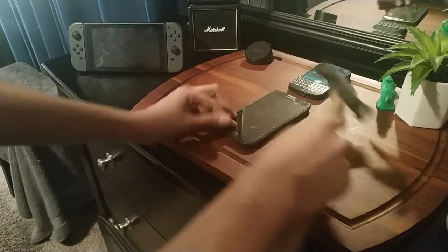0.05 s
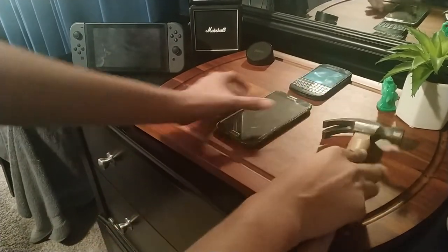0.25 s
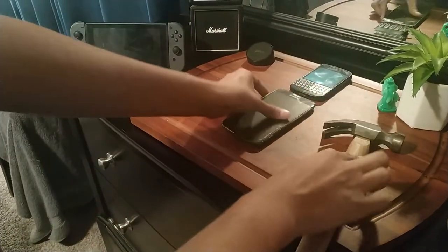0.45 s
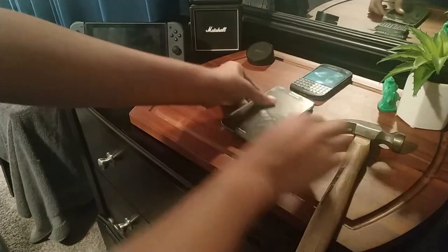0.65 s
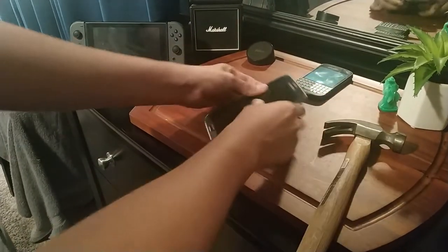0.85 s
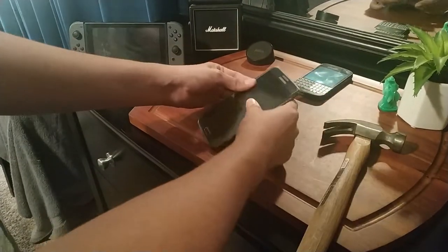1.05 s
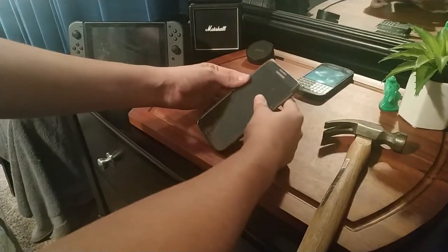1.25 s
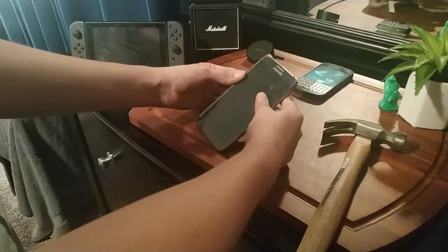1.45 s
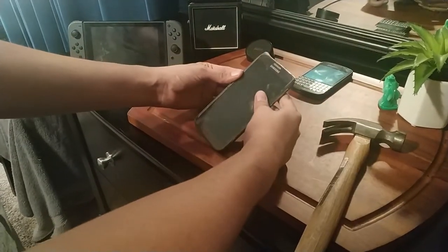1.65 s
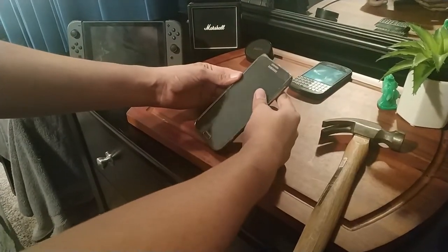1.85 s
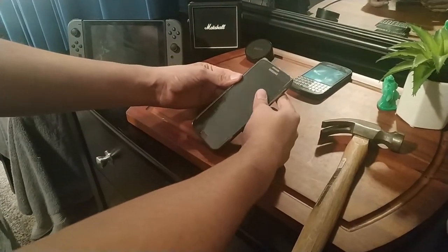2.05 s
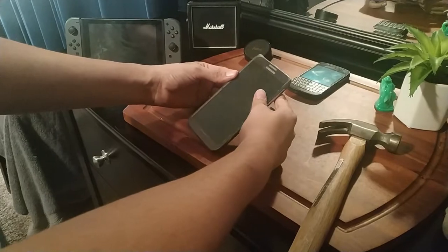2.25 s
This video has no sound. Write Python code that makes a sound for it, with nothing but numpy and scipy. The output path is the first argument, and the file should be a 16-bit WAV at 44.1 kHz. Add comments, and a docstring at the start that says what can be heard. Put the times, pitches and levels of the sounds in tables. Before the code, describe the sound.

Three quick hammer knocks on wood as it lands, followed by soft rubs and taps.

```python
"""At a desk in a small room, a claw hammer is laid down on a wooden board. Head, claw and handle land
in three sharp knocks with light rocking between. Each landing rings the board and thuds the desk, the
hard ones ring the hammer too, and the wall sends back a quick echo. Then two hands slide a phone off
the board and turn it over, with faint rubs and taps. A low room rumble runs underneath."""
import sys
import numpy as np
from scipy import signal
from scipy.fft import rfft, irfft, next_fast_len
from scipy.io import wavfile
from scipy.ndimage import uniform_filter1d, minimum_filter1d

SR = 44100
rng = np.random.default_rng(int(sys.argv[2]) if len(sys.argv) > 2 else 0)


def digitize_waveform(pressure):
    """Quantize a signal to 16-bit integers and store it at the path in sys.argv[1].

    Rows of a 2-D input are taken as channels; values are limited to [-1, 1].
    """
    field = np.atleast_2d(pressure).T
    bounded = np.clip(field, -1, 1)
    quanta = np.round(bounded * 32767).astype(np.int16)
    wavfile.write(sys.argv[1], SR, quanta)


N = 101429
TIME = np.arange(N) / SR
ROOM_FADE_S, TOUCH_RISE_S = 0.32, 0.00033  # every fade time is the time to fall by 60 dB


def from_db(db):
    """Turn decibels into a number to multiply by."""
    return 10 ** (np.asarray(db) / 20)


def unit_power(x):
    """Scale a sound so that its average power is one."""
    return x / np.sqrt(np.mean(x ** 2) + 1e-20)


def noise(spectrum, colour=np.zeros_like):
    """Noise shaped by (pitch_hz, level_db) rows, brought to power one, then tinted by a colour in dB."""
    hz, db = np.transpose(spectrum)
    size = next_fast_len(N)
    bins_hz = np.maximum(np.fft.rfftfreq(size, 1 / SR), 1)
    shape = unit_power(from_db(np.interp(np.log(bins_hz), np.log(hz), db)))
    gain = shape * from_db(colour(bins_hz))
    return irfft(rfft(rng.standard_normal(size)) * gain, size)[:N]


def decay(fade_s):
    """Die away by 60 dB every fade_s seconds."""
    return np.exp(-np.minimum(np.log(1000) * TIME / fade_s, 40))


def rise(seconds):
    """Build up smoothly from zero to one."""
    return 1 - np.exp(-TIME / seconds)


def stroke(middle_s, half_length_s):
    """A movement swells to its middle and fades again."""
    return np.exp(-((TIME - middle_s) / half_length_s) ** 2 / np.sqrt(2))


def struck_tone(hz, fade_s):
    """One pure tone of a struck object, dying away."""
    return np.sin(2 * np.pi * hz * TIME) * decay(fade_s)


def at(start_s, x):
    """Delay a sound to its starting time."""
    return np.concatenate([np.zeros(max(int(start_s * SR), 0)), x])[:N]


def low_pass(x, hz):
    """Dull a sound by turning down what lies above hz."""
    return signal.sosfilt(signal.butter(2, min(hz, SR / 2 - 1), fs=SR, output="sos"), x)


def resonant(x, hz, width_hz):
    """Keep a narrow band around one pitch, brought to power one."""
    return unit_power(signal.lfilter(*signal.iirpeak(hz, hz / width_hz, fs=SR), x))


def room_background():
    """Steady room noise and a low rumble that swells and sinks."""
    # tone of the steady noise: pitch_hz, level_db
    steady_spectrum = [(25, 5), (60, -10.5), (100, -12), (200, -13.5), (350, -16), (410, -20.5), (470, -16),
                       (560, -24.5), (800, -24), (2400, -32.5), (2850, -24.5), (3300, -31.5), (6000, -47),
                       (11000, -39), (13500, -32.5)]
    # tone of the rumble: pitch_hz, level_db
    rumble_spectrum = [(12, -19.5), (20, -9.5), (30, 1), (58, -3), (90, -10), (200, -19), (600, -49.5)]
    # loudness of the rumble: time_s, level_db
    rumble_levels = [(0.0, -49), (0.06, -44), (0.16, -53), (0.24, -30.5), (0.28, -51), (0.33, -35),
                     (0.72, -56.5), (0.85, -40.5), (1.0, -62), (1.41, -50), (1.57, -56.5), (2.3, -51)]
    rumble_gain = from_db(np.interp(TIME, *np.transpose(rumble_levels)))
    return from_db(-56) * noise(steady_spectrum) + rumble_gain * noise(rumble_spectrum)


def slides_and_rubs():
    """Grainy friction: things slide on wood, and skin rubs the phone, which sounds hollow in the grip."""
    # slides over the wood: middle_s, half_length_s, level_db
    slides = [(0.025, 0.08, -53.5), (0.694, .03, -47.5), (0.793, 0.0705, -49.5)]
    # tone of sliding: pitch_hz, level_db
    slide_spectrum = [(100, 1.5), (400, 1.5), (1300, 4), (2900, 5), (5000, -10), (8000, -14.5),
                      (11000, -5.5), (14000, 1.5)]
    # skin rubbing the phone: middle_s, half_length_s, level_db, grip_pitch_hz, grip_db
    rubs = [(1.244, 0.074, -67, 257, -81), (1.34, 0.042, -74.5, 430, -60), (1.438, .04, -59.5, 306, -52.5),
            (1.561, 0.082, -69.5, 330, -62), (1.791, 0.036, -72, 390, -50), (1.844, 0.03, -68, 343, -60.5),
            (2.02, .12, -70, 410, -60), (2.233, .03, -65, 308, -71)]
    # tone of rubbing: pitch_hz, level_db
    rub_spectrum = [(200, 2.5), (900, 1.5), (1600, 3.5), (2800, -4.5), (4500, -8), (7000, -32),
                    (14000, -14)]
    # the phone's case rings under the skin: pitch_hz, level_db
    case_tones = [(2130, -6.5), (2850, -7), (3550, -9.5)]
    flutter = unit_power(low_pass(rng.standard_normal(N), hz=148))
    grain = unit_power(from_db(2.5 * flutter))  # fast level changes sound rough
    out = noise(slide_spectrum) * sum(from_db(db) * stroke(s, half_s) for s, half_s, db in slides)
    friction = noise(rub_spectrum)
    case_ring = sum(from_db(db) * resonant(friction, hz, width_hz=200) for hz, db in case_tones)
    skin = noise(rub_spectrum) + case_ring
    for middle_s, half_s, db, grip_hz, grip_db in rubs:
        hollow = from_db(grip_db) * resonant(friction, grip_hz, width_hz=93)
        out += stroke(middle_s, half_s) * (from_db(db) * skin + hollow)
    return out * grain


def finger_taps():
    """Fingers and phone touch lightly: each tap is a tick that lingers in the room, plus a soft bump."""
    # light touches: start_s, tick_db, brightness_hz, bump_db
    taps = [(0.619, -43, 5000, -59), (0.687, -44.5, 11000, -79), (0.814, -53.5, 7000, -50),
            (1.078, -48.5, 9100, -46.5), (1.178, -62, 3500, -51.5), (1.409, -47, 2500, -50.5),
            (2.183, -77, 1980, -52)]
    # tone of the tick: pitch_hz, level_db
    tick_spectrum = [(200, -10), (600, 6), (1500, 13), (2900, 17), (4500, 3), (7000, -23), (14000, -32)]
    # tone of the low bump: pitch_hz, level_db
    bump_spectrum = [(50, -4), (120, 7.5), (200, 2), (280, 2.5), (450, -16), (900, -17), (3000, -31)]
    tick_fade = decay(0.027) + from_db(-4.5) * decay(ROOM_FADE_S)
    out = np.zeros(N)
    for start_s, tick_db, brightness_hz, bump_db in taps:
        tick = from_db(tick_db) * low_pass(noise(tick_spectrum), brightness_hz) * tick_fade
        bump = from_db(bump_db) * noise(bump_spectrum) * decay(0.39)
        out += at(start_s, (tick + bump) * rise(TOUCH_RISE_S))
    return out


def case_creaks():
    """The phone's case slips twice, each time with a tiny high ring."""
    # slips of the case: start_s, level_db
    slips = [(2.224, -34), (2.2296, -37)]
    creak = struck_tone(hz=2700, fade_s=0.01) * rise(TOUCH_RISE_S)
    return sum(at(start_s, from_db(db) * creak) for start_s, db in slips)


def board_tone(hz):
    """One tone of the struck board, wavering at random as if close tones were beating with it."""
    fade_s = 0.33 * (1000 / hz) ** 0.15  # higher tones die sooner
    waver_depth, waver_hz = 0.2, 20
    step_times = np.arange(0, N / SR, 1 / (2 * waver_hz))
    steps = waver_depth * rng.standard_normal((2, len(step_times)))
    swell, phase = (np.interp(TIME, step_times, row) for row in steps)
    strength = from_db(-1.5 * rng.standard_normal())  # a little different at each blow
    return strength * (1 + swell) * np.sin(2 * np.pi * hz * TIME + phase) * decay(fade_s)


def board_knocks():
    """Each landing of the hammer rings the board and thuds the desk, and the room rings on."""
    # landings: start_s, level_db (all but the thud), rise_s, low_db, middle_db, treble_db, top_db,
    # ring_db, thud_db, room_db
    landings = [(0.2102, 6, .0015, -1, 3, -11, 0.5, -3, -35.5, -4),
                (0.297, -2.5, .002, 1, 2.5, -12, -5.5, -6, -38, -6.5),
                (0.3455, 2.5, .0007, 1, 4, -10, -4.5, -2, -34, 5),
                (0.4509, -14, .002, 0, 5, -12.5, -19.5, -3.5, -50.5, -2),
                (0.4605, 3.5, 0.00087, -1, -2.5, -3, -13, -1.5, -29.5, 5)]
    # where a landing's low, middle, unchanged, treble and top ranges lie: pitch_hz
    ranges_hz = [500, 1300, 2200, 3400, 5500]
    # ringing tones of board and desk: pitch_hz
    board_pitches = [410, 474, 689, 820, 1084, 1106, 1150, 1187, 1302, 1528, 1572, 1625, 1695, 2005, 2083,
                     2170, 2263, 2446, 2618, 2762, 2902, 3080]
    # strength of each of those tones: level_db
    board_levels = [-35.5, -30, -29.5, -26.5, -23.5, -25.5, -27, -27.5, -23, -23, -27.5, -24.5, -31.5, -29,
                    -28, -33, -28.5, -26.5, -27, -29.5, -29, -30.5]
    # the wood's crowded, short-lived tones, heard as noise: pitch_hz, level_db
    wood_spectrum = [(100, -19), (350, -16), (700, -6), (1300, 1), (2200, 1.5), (3100, -2), (4000, -6.5),
                     (5500, -24), (8000, -38)]
    # low tones of the desk: pitch_hz, level_db, fade_s
    desk_tones = [(61, 3, 0.38), (173, -4, 0.18), (232, -2, 0.1)]
    # sound that lingers in the room: pitch_hz, level_db
    room_spectrum = [(80, -16), (200, -7.5), (330, -10.5), (550, -11.5), (750, -8), (950, -12.5),
                     (1200, -7), (1600, -3.5), (1800, -5), (2600, -1.5), (3300, -8), (4000, -8),
                     (5000, -20.5), (6500, -41.5), (9000, -40.5)]
    # the high hiss in that lingering sound: pitch_hz, level_db
    air_spectrum = [(5000, -7), (7000, -6), (9000, -3), (11000, -13.5), (13500, -1)]
    out = np.zeros(N)
    for start_s, db, rise_s, low_db, middle_db, treble_db, top_db, ring_db, thud_db, room_db in landings:
        def colour(hz):
            """How many dB this landing adds or takes away at a pitch."""
            return np.interp(np.log(hz), np.log(ranges_hz), [low_db, middle_db, 0, treble_db, top_db])
        ring = sum(from_db(ring_db + tone_db + colour(hz)) * board_tone(hz)
                   for hz, tone_db in zip(board_pitches, board_levels))
        wood = from_db(-8.5) * noise(wood_spectrum, colour) * decay(0.05)
        room = from_db(-20.5) * noise(room_spectrum, colour) + from_db(-49) * noise(air_spectrum)
        tail = from_db(room_db) * room * rise(0.023) * decay(ROOM_FADE_S)
        thud = sum(from_db(thud_db + tone_db) * struck_tone(hz, fade_s)
                   for hz, tone_db, fade_s in desk_tones)
        knock = (ring + wood) * rise(rise_s) + tail
        out += at(start_s, from_db(db) * knock + thud)
    return out


def hammer_clacks():
    """In the three hard knocks the hammer itself rings briefly, with a snap of noise."""
    # hard knocks: start_s, snap_db, snap_fade_s
    hard_knocks = [(0.2108, -26.5, 0.039), (0.3456, -30.5, 0.031), (0.4607, -21.5, 0.018)]
    # tones of steel head and handle in each hard knock: pitch_hz, fade_s, first_db, second_db, third_db
    hammer_tones = [(452, .07, -13, -18.5, -33), (1236.4, 0.1, -4.5, -11.5, -48.5),
                    (2090, .07, -10, -30, -16.5), (2870, 0.021, -28, -5, 0.5), (3050, 0.023, -8, -2, -26),
                    (3890, .025, -19, -42.5, -9), (5060, .05, -44.5, -30, -33),
                    (5350, .045, -24.5, -39, -46), (7400, 0.015, -49.5, -32, -31),
                    (12300, 0.006, -37, -51, -18.5), (13430, .035, -31, -37.5, -45)]
    out = np.zeros(N)
    for k, (start_s, snap_db, snap_fade_s) in enumerate(hard_knocks):
        ring = sum(from_db(levels[k]) * struck_tone(hz, fade_s) for hz, fade_s, *levels in hammer_tones)
        snap = from_db(snap_db) * rng.standard_normal(N) * decay(snap_fade_s)
        out += at(start_s, (ring + snap) * rise(0.00043))
    return out


def scene():
    """Everything heard close up in one channel; the knocks bounce once off the wall behind the desk."""
    hammer = board_knocks() + hammer_clacks()
    echo = from_db(-10.5) * at(0.0112, low_pass(hammer, hz=1700))
    phone = finger_taps() + case_creaks() + slides_and_rubs()
    return (hammer + echo + phone + room_background())[None]


def record(dry):
    """A fast limiter turns down the loudest peaks, then the highest treble is cut."""
    ceiling, window_s, cutoff_hz = 0.97, 0.002, 14350
    window = int(window_s * SR)
    needed_gain = ceiling / np.maximum(np.abs(dry), ceiling)
    smooth_gain = uniform_filter1d(minimum_filter1d(needed_gain, window), window)
    treble_cut = signal.ellip(12, 0.1, 90, cutoff_hz, fs=SR, output="sos")
    return signal.sosfilt(treble_cut, dry * smooth_gain)


dry = scene()
out = record(dry)
digitize_waveform(out)
```